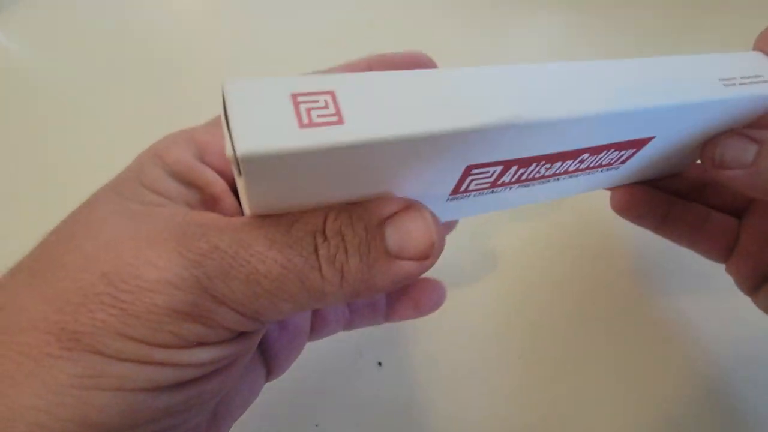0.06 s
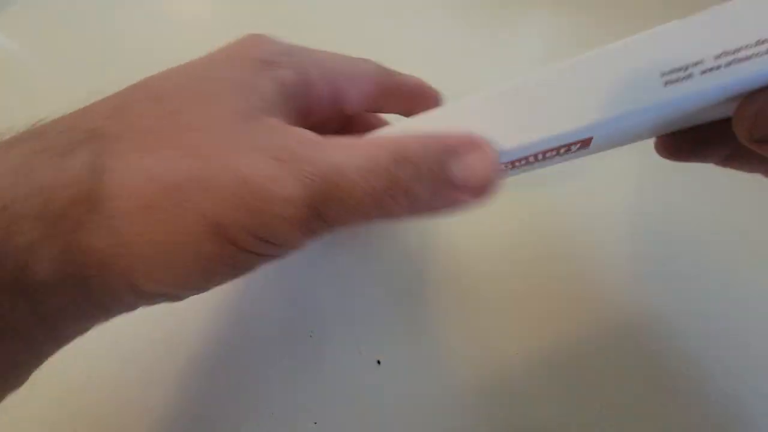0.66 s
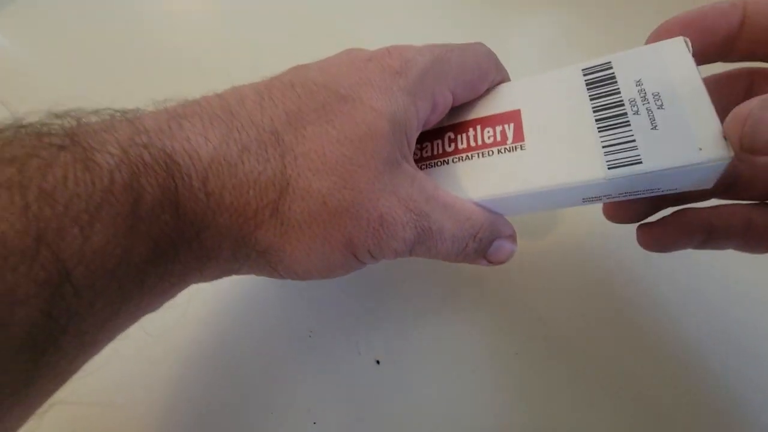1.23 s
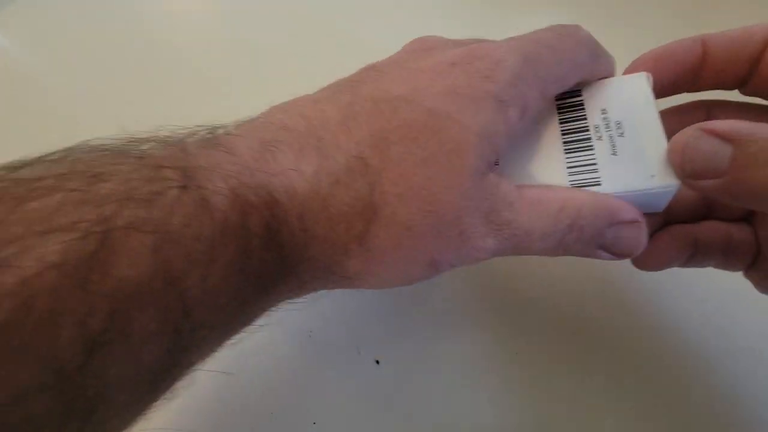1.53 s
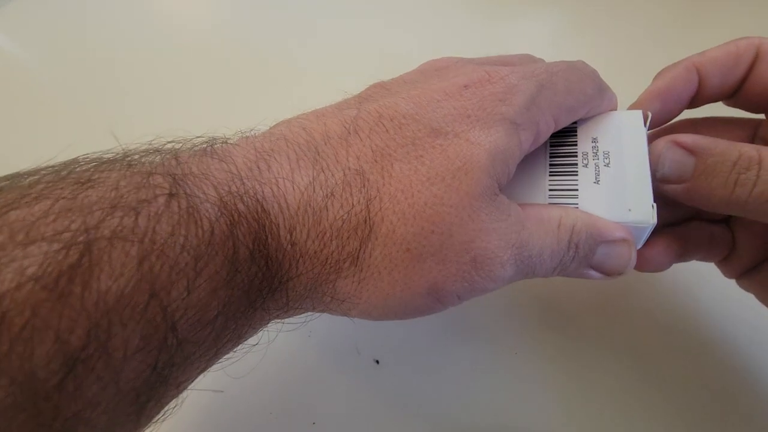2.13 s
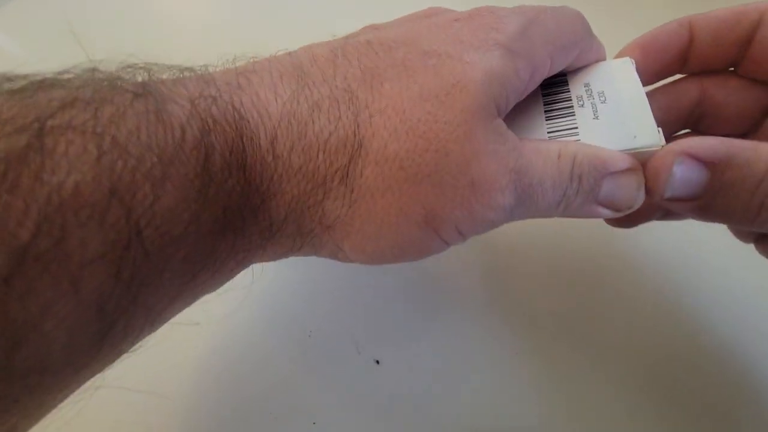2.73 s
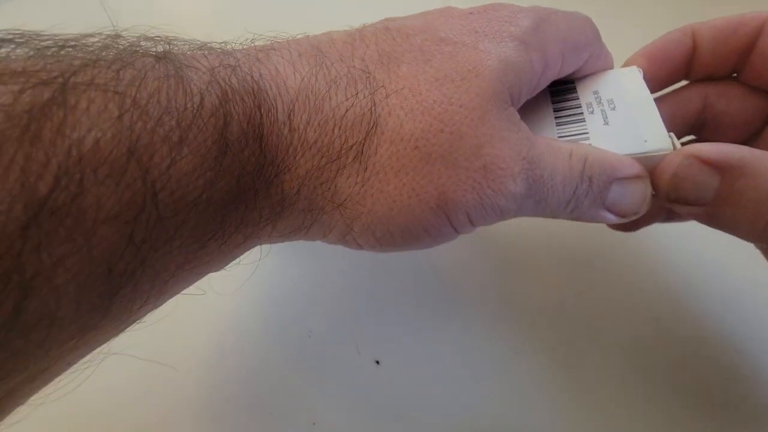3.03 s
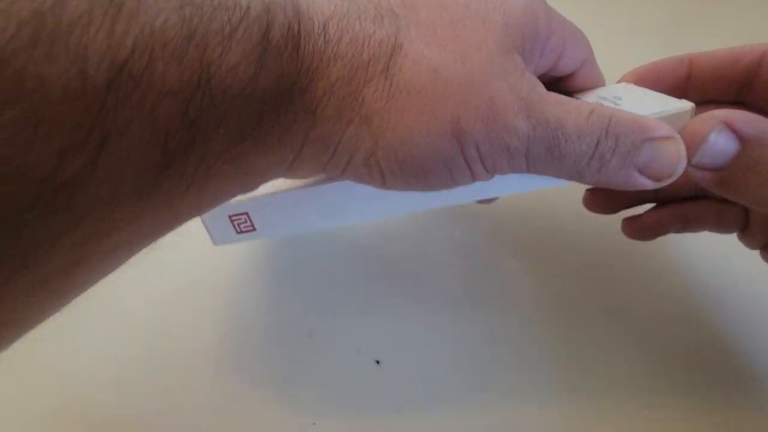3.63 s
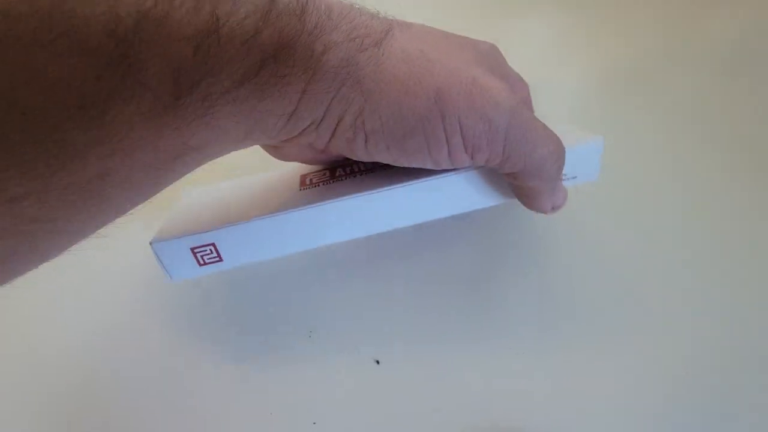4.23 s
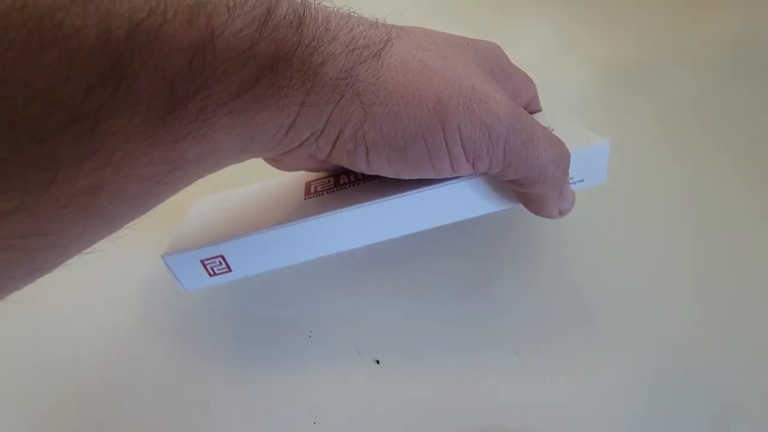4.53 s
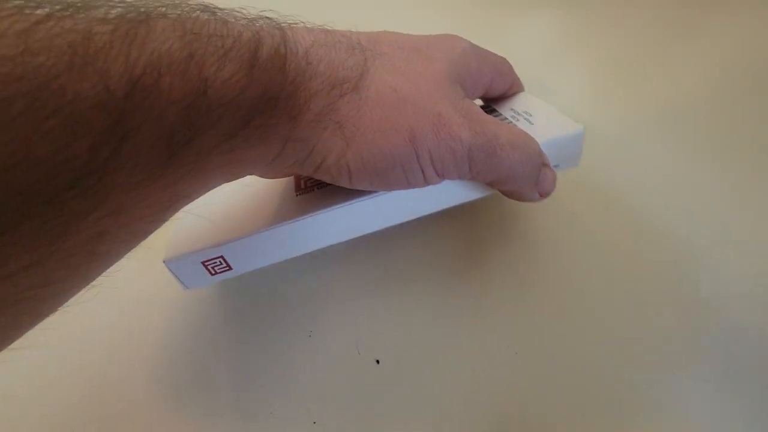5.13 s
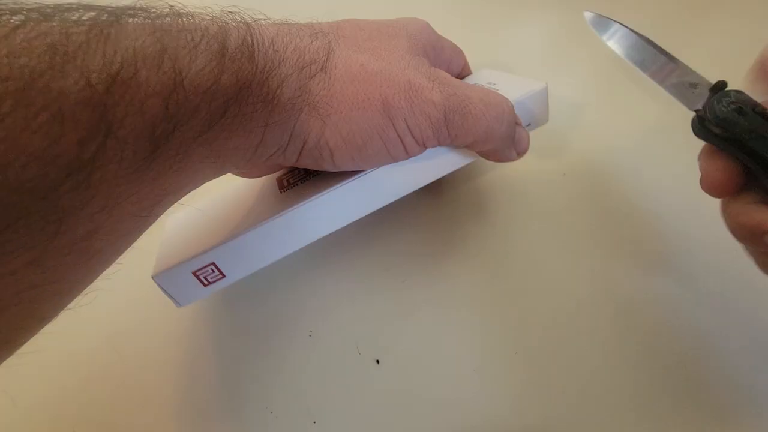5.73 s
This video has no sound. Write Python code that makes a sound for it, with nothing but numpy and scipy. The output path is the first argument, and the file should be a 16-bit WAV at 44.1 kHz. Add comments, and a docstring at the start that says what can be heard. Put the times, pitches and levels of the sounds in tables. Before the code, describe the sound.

A quiet appliance hum and soft room noise run throughout in a small indoor space. From the start, fingers rub and tap a slim cardboard box close by, with a brief scrape along its edge at about 0.4 seconds. Faint sliding and scattered light taps continue until about 2 seconds, then grow sparser. A barely audible thin, high whistle wavers between 2.6 and 3.7 seconds, ending around a firmer tap. From about 4.1 to 4.4 seconds the box is set down on a table in a loud, quick clatter of hollow knocks with a slight papery crackle. A soft finger tap follows at 4.7 seconds. At about 5.5 seconds a folding knife opens on the right: a small tick, a very short swish and a sharp metallic click as the blade locks. A short room reverberation follows the impacts.

```python
"""Fingers rub and tap a slim cardboard box, over the quiet hum of an appliance in a small room.
Stick-slip friction makes the rubbing; each tap excites the damped modes of the card. A faint, thin
whistle comes and goes. The box is set down on a table in a clatter of impacts, edge after edge.
Last, a folding knife snaps open to the right: its blade leaves the detent, swings and strikes the lock.
Level and time differences between the channels place box and knife; diffuse reverberation follows both."""
import sys
import numpy as np
from scipy import signal
from scipy.fft import rfft, irfft, next_fast_len
from scipy.io import wavfile

SR = 44100
rng = np.random.default_rng(int(sys.argv[2]) if len(sys.argv) > 2 else 0)


def to_wav(sig):
    """Store sig (one row per channel, or 1-D mono) as 16-bit WAV at the path in sys.argv[1].

    Samples outside -1..1 are clipped; the rate is SR.
    """
    pcm = np.clip(np.atleast_2d(sig), -1, 1) * 32767
    pcm = np.round(pcm).astype(np.int16)
    wavfile.write(sys.argv[1], SR, pcm.T)  # frames by channels


N = 254412
TIME = np.arange(N) / SR
FREQS = np.maximum(np.fft.rfftfreq(N, 1 / SR), 1)
LOCK_S, CUTOFF_HZ = 5.5255, 16000

# room air: (frequency [Hz], spectral level [dB])
AIR_SPECTRUM = [(25, -13.5), (48, 5.5), (110, -5.5), (220, -8.5), (290, -3.5), (440, -4), (620, -12),
                (820, -7), (1800, -9.5), (3800, -20.5), (6400, -16.5), (8300, -35.5), (10000, -34),
                (12000, -50), (15500, -49)]
# likeness of the air in the two channels: (frequency [Hz], correlation [-1 to 1])
AIR_CORRELATION = [(60, 0.84), (270, 0.7), (420, -0.58), (800, -.5), (1400, -1), (1900, 0), (2500, -0.5),
                   (3300, -0.02), (6000, 0)]
# partials of the appliance: (frequency [Hz], rms wander [Hz], level [dB])
HUM_PARTIALS = [(45.9, 4.3, -71), (188.3, 5.37, -72.5), (275.4, 3.92, -61), (378, 9.8, -73)]

# fingers dragging over the card: (time [s], level [dB])
DRAG_LEVELS = [(0, -55), (.13, -63.5), (.45, -46.5), (.7, -55), (1.5, -60.5), (1.65, -72), (1.83, -60),
               (2.1, -59), (2.2, -87), (4.0, -74), (4.3, -100)]
# strokes of the palm: (start [s], duration [s], level [dB])
PALM_STROKES = [(0.359, 0.18, -58), (0.524, 0.33, -64.5), (0.782, 0.18, -60), (1.332, 0.24, -55),
                (1.633, 0.11, -59.5), (2.344, 0.025, -61), (2.414, 0.08, -58.5), (3.225, 0.057, -59),
                (3.38, 0.036, -63.5), (3.607, 0.34, -62), (4.675, 0.077, -60)]
# friction of skin on card: (frequency [Hz], spectral level [dB])
RUB_SPECTRUM = [(150, -12.5), (370, -1), (600, -8.5), (850, 0.5), (1300, -2.5), (2700, -2), (3400, -7.5),
                (5000, -20.5), (8000, -37)]
HISS_SPECTRUM = [(1500, -6.5), (3000, -1.5), (4200, -3), (5500, 0.5), (6800, 0.5), (8300, -21.5),
                 (10000, -7), (11800, -24.5), (15500, -16.5)]
# resonance of the gap between palm and box: (time [s], frequency [Hz])
GAP_PITCH = [(0, 2018), (.28, 2186), (.72, 1749), (1.0, 1846)]
# fingers on the box: (time [s], level [dB], hardness [0 pad to 1 nail], slip time [s])
FINGER_TAPS = [(0.0888, -46, 1, 0.00096), (0.159, -36, 0.75, 0.0032), (0.173, -36.5, 0.75, 0.0046),
               (0.294, -53, .05, 0.0072), (0.3731, -35, 0.63, 0.0048), (0.469, -53.5, .03, 0.02),
               (0.752, -40.5, 0.14, 0.0032), (0.818, -48, 0.1, 0.004), (.834, -45, 0.5, 0.025),
               (0.893, -51.5, 0.03, .002), (0.944, -45, 0.59, 0.005), (0.989, -51.5, 0.2, 0.007),
               (1.1, -43.5, 0.47, 0.011), (1.1457, -49.5, 0.38, 0.0012), (1.704, -50.5, 0.29, 0.013),
               (1.809, -44, 0.5, 0.026), (1.862, -51, 0.27, 0.0033), (1.9455, -47, 0.47, 0.0012),
               (1.975, -40.5, 0.89, 0.015), (2.0765, -43, 0.53, 0.0015), (2.102, -48, 0.41, 0.0013),
               (2.156, -53, 0.3, 0.006), (2.674, -38, 0.62, 0.0024), (2.764, -45, 1, 0.0019),
               (2.852, -45.5, 0.45, 0.0048), (2.99, -52, .9, .003), (3.09, -42.5, 0.81, 0.0025),
               (3.157, -55, 0.65, 0.0041), (3.66, -32, 0.36, 0.005), (3.664, -34.5, 0.6, 0.0023),
               (3.9, -55.5, .03, 0.0093), (4.675, -38, 0.26, 0.003), (5.597, -46.5, 0.2, 0.0013)]
# parts of the held box under a finger: (frequency [Hz], bandwidth [Hz], gain [dB])
THUMP_MODES = [(98, 13, 7), (192, 125, 3.5), (346, 79, -1), (506, 31, -5)]
PANEL_MODES = [(790, 99, 5), (1000, 370, -10), (1243, 114, -1.5), (1854, 220, -4.5)]
FLAP_MODES = [(1880, 280, -2), (2170, 270, 6), (2520, 230, 3.5)]
CORNER_MODES = [(2600, 250, 3.6), (2770, 230, 2.3)]
TICK_MODES = [(4470, 2200, -1.5), (5930, 440, 10), (14000, 3000, -27)]
EDGE_MODES = [(1360, 87, 13), (2010, 230, -4), (2630, 710, 1.5), (3950, 300, 1)]
# an edge scraping along the thumb: (start [s], duration [s], level [dB], treble limit [Hz])
EDGE_SCRAPES = [(0.369, 0.0051, -36.5, 4400), (0.377, 0.037, -44, 6750), (0.406, 0.008, -43, 2000),
                (0.422, 0.076, -51.5, 4500), (0.512, 0.021, -45.5, 1160)]

# the thin whistle: (time [s], frequency [Hz], level [dB])
WHISTLE_PATH = [(2.56, 7240, -92), (2.64, 7540, -93), (2.69, 8600, -83), (2.755, 8900, -86),
                (2.795, 8600, -82), (2.88, 9400, -90), (2.945, 10450, -83), (2.99, 10100, -78),
                (3.095, 9800, -92), (3.155, 10280, -79), (3.191, 8700, -96), (3.31, 8340, -95),
                (3.37, 9100, -97), (3.46, 7700, -99), (3.66, 9000, -98)]

# box edges meeting the table:
# (time [s], level [dB], hardness [0 full weight to 1 light clack], relative crackle [dB], boom [Hz])
EDGE_BLOWS = [(4.0802, -19.5, 0.39, -6, 520), (4.092, -23, 0.31, -13, 456), (4.1, -13.5, 0.37, -11, 330),
              (4.159, -19.5, 0.034, -9.5, 400), (4.172, -15.5, 0.48, -15.5, 543),
              (4.199, -15, .58, -16, 480), (4.2146, -13, 0.93, -22, 480), (4.219, -18.5, .8, -10, 504),
              (4.227, -12, 0.57, -21, 470), (4.242, -19, 0.44, -27, 400), (4.302, -16.5, 0.95, -29, 423),
              (4.319, -18.5, 0.99, -17, 404), (4.328, -29.5, 0.54, -26, 393),
              (4.363, -23.5, 0.72, -27, 483)]
# table and box under those blows: (frequency [Hz], bandwidth [Hz], gain [dB])
TABLE_MODES = [(85.6, 16, -5), (129, 17, -3), (203, 45, -6)]
HOLLOW_MODES = [(299, 27, 5), (389, 43, 1), (430, 61, -3), (479, 31, 1.5), (516, 15, 4), (610, 47, -11.5)]
WALL_MODES = [(808, 140, 8.1), (1031, 34, 13.8), (1177, 38, 5.3), (1242, 50, 13.7), (1610, 52, 2.1)]
CLACK_MODES = [(460, 300, 1), (880, 200, 1), (1180, 330, -2), (1610, 174, 6.5), (1920, 400, -5.5),
               (2590, 460, -7.5)]
RING_MODES = [(609, 5.5, 6), (890, 11, 3), (1346, 3.5, -3)]
CRACKLE_MODES = [(2880, 300, 10.5), (3660, 250, 1), (4060, 340, 10), (5100, 210, 3), (6020, 140, 6),
                 (10000, 640, -11), (14100, 2800, -15)]

# the blade chattering out of its detent: (time [s], level [dB])
DETENT_CLICKS = [(5.4733, -21), (5.4746, -24)]
# resonances of the knife: (frequency [Hz], bandwidth [Hz], gain [dB])
DETENT_MODES = [(2470, 500, -1), (3200, 490, 1), (4370, 220, 14.5), (5070, 230, -3.5), (5570, 300, 3),
                (10260, 500, -12.5)]
LOCK_MODES = [(255, 490, -5.5), (700, 540, -3.5), (3050, 71, 9), (3620, 170, 2), (4730, 870, 3.5),
              (5360, 220, -4), (8770, 12000, -5)]
# friction at the pivot: (frequency [Hz], spectral level [dB])
PIVOT_SPECTRUM = [(900, -31), (1300, -19), (1700, -6), (2400, 7.5), (3300, -1), (4600, -2.5), (6000, -5),
                  (9000, -19), (15000, -38)]
# a brief, faint hiss just before the lock's click: (frequency [Hz], spectral level [dB])
BRIEF_HISS_SPECTRUM = [(500, -20), (1200, -13), (1900, -16), (3000, -4.5), (4200, 1), (5500, 2.5),
                       (7000, -16), (9000, -19), (15000, -32)]

# level differences between the channels: (frequency [Hz], left minus right [dB])
AIR_BALANCE = [(60, -1.5), (110, -1.5), (200, 0), (380, -0.5), (700, 0), (1290, 9), (2380, 4), (4400, 4.5),
               (8120, -5.5), (15000, 5)]
BOX_BALANCE = [(100, 4.5), (400, 2), (800, -3), (1300, -0.5), (2400, -1), (4400, -13), (8000, -13.5),
               (15000, 0)]
KNIFE_BALANCE = [(500, -12), (2000, 10.5), (2750, -0.5), (3400, -3), (4700, -14), (7000, -13),
                 (9000, -18.5), (15000, 0)]
# later arrival of the landing on the left: (frequency [Hz], delay [ms])
LANDING_LAG = [(130, 0.084), (200, 0.92), (500, 0.88), (750, 0.52), (950, 0.56), (1300, 0.46), (1800, 0.41),
               (2800, 0.538), (6000, 0.73)]
# reverberation of the room: (frequency [Hz], time to fall 60 dB [s])
ROOM_T60 = [(100, 0.81), (500, 0.5), (1500, 0.12), (4000, 0.42), (9000, 0.2), (15000, 0.1)]
# what the room reflects of each source: (frequency [Hz], relative level [dB])
BOX_ECHO = [(80, -4), (300, -15.5), (1000, -3.5), (3000, 2), (6000, -10), (12000, 4.5)]
KNIFE_ECHO = [(80, 2), (300, -23), (1000, 0.5), (2200, 0.5), (4500, 4.5), (9000, 0.5), (15000, 9.5)]


def from_db(db):
    """Amplitude grows tenfold for every 20 dB."""
    return 10 ** (np.asarray(db) / 20)


def rms_one(x):
    """Normalisation to unit power."""
    return x / np.sqrt(np.mean(x ** 2) + 1e-20)


def at_hz(points, hz):
    """Interpolation on a logarithmic frequency axis."""
    table_hz, values = np.transpose(points)
    return np.interp(np.log(hz), np.log(table_hz), values)


def panned(left_db):
    """Constant-power law: left and right gains for a level difference."""
    gains = from_db(np.array([[.5], [-.5]]) * left_db)
    return gains / np.sqrt(np.mean(gains ** 2, axis=0))


def colour(x, spectrum):
    """Filtering by multiplication of spectra, at unit rms."""
    return rms_one(irfft(rfft(x) * from_db(at_hz(spectrum, FREQS)), N))


def drift(rate_hz):
    """Low-passed noise gives a random fluctuation of unit rms."""
    step = 8
    size = next_fast_len(N // step + 2, real=True)
    rolloff = 1 + (np.fft.rfftfreq(size, step / SR) / rate_hz) ** 2
    slow = irfft(rfft(rng.standard_normal(size)) / rolloff, size)
    return np.interp(np.arange(N) / step, np.arange(size), rms_one(slow))


def resonance(x, hz, width):
    """A damped oscillator: two poles, unit gain at the peak."""
    radius = np.exp(-np.pi * width / SR)
    feedback = [1, -2 * radius * np.cos(2 * np.pi * hz / SR), radius ** 2]
    return signal.lfilter(np.array([1, 0, -1]) * (1 - radius ** 2) / 2, feedback, x + 1e-18)


def softened(x, soft_hz):
    """A compliant contact acts as a low-pass filter."""
    return signal.sosfilt(signal.butter(2, soft_hz, fs=SR, output="sos"), x + 1e-18)


def radiated(x, order, low_hz):
    """A small body radiates long wavelengths poorly: a high-pass filter."""
    return signal.sosfilt(signal.butter(order, low_hz, "high", fs=SR, output="sos"), x + 1e-18)


def room_air():
    """Partly correlated noise: a sum and a difference signal set how alike the channels are."""
    mid, side = rfft(rng.standard_normal((2, N)))
    correlation = at_hz(AIR_CORRELATION, FREQS)
    pair = np.sqrt(1 + correlation) * mid + np.sqrt(1 - correlation) * side * [[1], [-1]]
    air = irfft(pair * panned(at_hz(AIR_BALANCE, FREQS)), N)
    return from_db(-57) * colour(air, AIR_SPECTRUM)


def appliance_hum():
    """Low partials waver by random modulation of frequency and amplitude."""
    hum = 0
    for hz, wander_hz, db in HUM_PARTIALS:
        phase = 2 * np.pi * np.cumsum(hz + wander_hz * drift(14.04)) / SR
        hum += from_db(db) * rms_one(np.cos(phase) * from_db(0.5 * drift(8.6)))
    return hum * panned(-5)


def friction(spectrum, grain_db, flutter_db):
    """Friction noise is the sum of countless tiny slips, uneven in size and coming in clumps."""
    noise = rng.standard_normal(N)
    return colour(noise * from_db(grain_db * drift(500) + flutter_db * drift(27)), spectrum)


def sliding_skin():
    """Dry friction of fingers and palm on card; a firmer stroke has more treble."""
    drag = from_db(np.interp(TIME, *np.transpose(DRAG_LEVELS)))
    brush = sum(from_db(db) * palm_stroke(start, length) for start, length, db in PALM_STROKES)
    rub = np.hypot(drag, from_db(-1.5) * brush) * friction(RUB_SPECTRUM, grain_db=2, flutter_db=3.5)
    hiss = friction(HISS_SPECTRUM, grain_db=1.5, flutter_db=2.5)
    # filtering forwards, then backwards, keeps the dull hiss nearly in phase with the bright
    dull = softened(softened(hiss, 9050)[::-1], 8900)[::-1]
    brightness = np.minimum(brush / from_db(-55), 1) ** 2
    stroke_hiss = brush * (dull + brightness * (hiss - dull))
    return from_db(-2) * rub + from_db(-5) * drag * palm_gap() + stroke_hiss


def palm_gap(width_hz=170):
    """Cavity resonance between palm and box: a band of noise whose pitch moves with the grip."""
    pitch = np.interp(TIME, *np.transpose(GAP_PITCH))
    carrier = np.exp(2j * np.pi * np.cumsum(pitch) / SR)
    return rms_one(np.real((drift(width_hz) + 1j * drift(width_hz)) * carrier))


def contacts(times, levels_db, grit, crush_s):
    """Contact force: an impulse, then a decaying crowd of slips; grit is their size against it."""
    force, t = np.zeros(N + SR), TIME[:SR // 16]
    for start, db, decay_s in zip(times, levels_db, np.broadcast_to(crush_s, len(times))):
        slips = rng.standard_normal(len(t)) * rng.exponential(1, len(t)) * np.exp(-t / decay_s)
        slips *= grit / np.linalg.norm(slips)
        slips[0] = 1
        force[round(start * SR):][:len(t)] += from_db(db) * slips / np.hypot(1, grit)
    return force[:N]


def struck(times, levels_db, modes, grit, crush_s, spread_db, soft_hz, centre_hz=None):
    """Modal superposition: contacts ring a body, and the spot struck shifts each mode's share."""
    ringing = 0
    for hz, width, db in modes:
        spot_db = 0 if centre_hz is None else -16.5 * np.log2(hz / centre_hz) ** 2
        mode_db = levels_db + spot_db + spread_db * rng.standard_normal(len(times))
        ringing += from_db(db) * resonance(contacts(times, mode_db, grit, crush_s), hz, width)
    energy = sum(from_db(2 * db) * np.pi * width / SR for _, width, db in modes)
    return softened(ringing, soft_hz) * np.sqrt(SR / 100 / energy)   # energy referred to 10 ms


def shares_db(hardness, best_hardness, focus_db, leak_db):
    """Energy partition: each part takes most from contacts near its own best hardness."""
    mismatch = hardness - np.array(best_hardness)[:, None]
    gains = from_db(-focus_db * mismatch ** 2) + from_db(leak_db)
    return 20 * np.log10(gains / np.linalg.norm(gains, axis=0))


def finger_taps(pad_crush_s=0.0077, snap_s=0.0017):
    """Impact excitation: soft pads thump the hollow box, harder touches ring its higher modes."""
    times, db, hardness, slip_s = np.transpose(FINGER_TAPS)
    shares = shares_db(hardness, [0.02, 0.34, 0.61, 0.78, 0.97], focus_db=219, leak_db=-22)
    thump_db, panel_db, flap_db, corner_db, tick_db = db + shares
    # a contact that lets go quickly also ticks
    tick_db = np.maximum(tick_db, db - 20 * np.log10(1 + (slip_s / snap_s) ** 2))
    thump = struck(times, thump_db, THUMP_MODES, grit=1.4, crush_s=slip_s + pad_crush_s,
                   spread_db=1, soft_hz=1080)
    panel = struck(times, panel_db, PANEL_MODES, grit=15, crush_s=slip_s, spread_db=0, soft_hz=2050)
    flap = struck(times, flap_db, FLAP_MODES, grit=4.8, crush_s=slip_s, spread_db=-2, soft_hz=3620)
    corner = struck(times, corner_db, CORNER_MODES, grit=5.6, crush_s=slip_s, spread_db=1, soft_hz=4230)
    tick = struck(times, tick_db, TICK_MODES, grit=9.5, crush_s=slip_s, spread_db=5, soft_hz=7440)
    return (from_db(6) * thump + from_db(4.5) * panel
            + from_db(-3.5) * (flap + corner) + from_db(-7) * tick)


def palm_stroke(start_s, length_s, swell_share=0.16, release_s=0.025):
    """Envelope of one sliding touch: linear rise, hold, exponential decay."""
    age = np.maximum(TIME - start_s, 0)
    swell = np.minimum(age / (swell_share * length_s), 1)
    return swell * np.exp(-np.clip(age - length_s, 0, 1) / release_s)


def scraping_edge(jerks_per_s=900, jerk_spread_db=2.5, attack_s=0.0011, release_s=0.0041):
    """Stick-slip motion: a card edge rings under an uneven run of tiny jerks."""
    scrapes, t = 0, TIME[:SR // 8]
    for start, length, db, soft_hz in EDGE_SCRAPES:
        jerks = (rng.random(len(t)) < jerks_per_s / SR) * rng.choice([-1, 1], len(t))
        jerks = jerks * from_db(jerk_spread_db * rng.standard_normal(len(t)))
        ring = sum(from_db(level) * resonance(jerks, hz, width) for hz, width, level in EDGE_MODES)
        envelope = np.minimum(t / attack_s, 1) * np.exp(-np.maximum(t - length, 0) / release_s)
        scrape = from_db(db) * envelope * rms_one(softened(ring, soft_hz))
        scrapes += np.pad(scrape, (round(start * SR), N))[:N]
    return scrapes


def whistle():
    """Frequency modulation of a faint pure tone: it wavers upward and sinks again."""
    times, hz, db = np.transpose(WHISTLE_PATH)
    pitch = np.interp(TIME, times, hz) + 35 * drift(17.7)
    envelope = from_db(np.interp(TIME, times, db)) * (TIME > times[0]) * (TIME < times[-1])
    return envelope * rms_one(np.sin(2 * np.pi * np.cumsum(pitch) / SR))


def box_landing():
    """Impacts excite both bodies: the table thumps, the box booms, its walls clack, paper crackles."""
    times, db, hardness, crackle_db, boom_hz = np.transpose(EDGE_BLOWS)
    shares = shares_db(hardness, [0.029, 0.38, 0.68, 1], focus_db=85, leak_db=-20)
    table_db, hollow_db, wall_db, clack_db = db + shares
    table = struck(times, table_db, TABLE_MODES, grit=0.71, crush_s=0.015, spread_db=4.5, soft_hz=406)
    hollow = struck(times, hollow_db, HOLLOW_MODES, grit=1, crush_s=0.013,
                    spread_db=1.5, soft_hz=1080, centre_hz=boom_hz)
    wall = struck(times, wall_db, WALL_MODES, grit=14, crush_s=0.0049, spread_db=0.5, soft_hz=2780)
    clack = struck(times, clack_db, CLACK_MODES, grit=10, crush_s=0.0053, spread_db=1, soft_hz=2900)
    ring = struck(times, db, RING_MODES, grit=1, crush_s=0.0045, spread_db=5.5, soft_hz=3970)
    crackle = struck(times, db + crackle_db, CRACKLE_MODES, grit=4.7, crush_s=0.0078,
                     spread_db=2, soft_hz=9200)
    landing = (from_db(2) * table + from_db(5) * hollow + from_db(1.5) * (wall + clack)
               + from_db(-16) * ring + from_db(-2) * crackle)
    return radiated(landing, order=3, low_hz=72)


def blade_swing(rise_db_per_s=274, stop_s=0.0016, hiss_s=0.0078):
    """Pivot friction grows with the blade's speed; a brief, faint hiss precedes the lock's click."""
    to_lock = LOCK_S - TIME
    rise = from_db(-38.5 - rise_db_per_s * np.clip(to_lock, 0, 1))
    stop = np.exp(np.minimum(to_lock, 0) / stop_s)
    pivot = rise * stop * friction(PIVOT_SPECTRUM, grain_db=-2, flutter_db=-1)
    hiss_gain = from_db(-24) * np.exp(-(to_lock / hiss_s) ** 4) * (to_lock > 0)
    return pivot + hiss_gain * colour(rng.standard_normal(N), BRIEF_HISS_SPECTRUM)


def blade_detent():
    """Contact chatter rings the small detent as the blade slips out of it."""
    times, db = np.transpose(DETENT_CLICKS)
    chatter = struck(times, db, DETENT_MODES, grit=1, crush_s=0.0024, spread_db=4.5, soft_hz=9670)
    return from_db(-9.5) * radiated(chatter, order=2, low_hz=1710)


def blade_lock(handle_hz=2830, swell_s=0.00046):
    """Steel strikes its stop with a click; the handle's vibration swells and is damped by the hand."""
    click = struck([LOCK_S], np.array([-13.5]), LOCK_MODES, grit=0.3, crush_s=0.0035,
                   spread_db=-0.5, soft_hz=10900)
    age = np.clip(TIME - LOCK_S, 0, 1)
    envelope = age / swell_s * np.exp(1 - age / swell_s)
    handle = envelope * np.sin(2 * np.pi * handle_hz * age)
    return softened(click, 12000) + from_db(1.5) * handle


def two_faces(source, own_db):
    """Partial coherence: each channel faces other panels, adding its own sound to a shared one."""
    own = from_db(own_db)
    return (source() + own * np.array([source(), source()])) / np.hypot(1, own)


def from_the_right(x, balance, lag_ms):
    """Path difference and shadowing: the left channel is later and, in most of the treble, weaker."""
    delay = np.exp(-2j * np.pi * FREQS * lag_ms / 1000 * np.array([[1], [0]]))
    return irfft(rfft(x) * panned(at_hz(balance, FREQS)) * delay, N)


def room(x, echo, wet_db, build_s):
    """Diffuse reverberation: reflections build up, then each octave decays at its own rate."""
    t, edges = TIME[:SR // 2], 50 * 2 ** np.arange(9.)
    tail = 0
    for low, high in zip(edges, [*edges[1:], CUTOFF_HZ]):
        bandpass = signal.butter(2, [low, high], "band", fs=SR, output="sos")
        band = signal.sosfilt(bandpass, rng.standard_normal((2, len(t))))
        hz = np.sqrt(low * high)
        tail += band * from_db(at_hz(echo, hz) - 60 * t / at_hz(ROOM_T60, hz))
    tail = rms_one(tail * (1 - np.exp(-t / build_s))) / np.sqrt(len(t))
    return from_db(wet_db) * signal.fftconvolve(x[None], tail, axes=1)[:, :N]


def scene():
    """Superposition of the direct sound of box and knife, their reverberation and the background."""
    handling = (two_faces(sliding_skin, own_db=10.5)
                + two_faces(scraping_edge, own_db=-1.5)
                + two_faces(finger_taps, own_db=3.5) * from_db(-3))
    landing = two_faces(box_landing, own_db=-1.5) * from_db(-1)
    knife = blade_swing() + blade_detent() + blade_lock()
    direct = (from_the_right(handling, BOX_BALANCE, lag_ms=0.75) * panned(-1.37)
              + from_the_right(landing, BOX_BALANCE, lag_ms=at_hz(LANDING_LAG, FREQS))
              + from_the_right(knife, KNIFE_BALANCE, lag_ms=0.78))
    box_room = room((handling + landing)[1], BOX_ECHO, wet_db=-11, build_s=0.0007)
    knife_room = room(knife, KNIFE_ECHO, wet_db=-19.5, build_s=0.012) * panned(-5)
    return direct + box_room + knife_room + room_air() + appliance_hum() + whistle()


def record(dry):
    """Soft saturation rounds the loudest peak; a low-pass filter limits the bandwidth."""
    saturated = 1.05 * np.tanh(dry / 1.05)
    lowpass = signal.firwin(201, CUTOFF_HZ, fs=SR)
    return signal.fftconvolve(saturated, lowpass[None], mode="same", axes=1)


dry = scene()
out = record(dry)
to_wav(out)
```